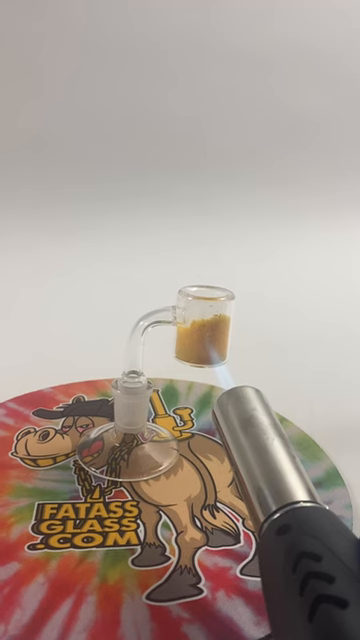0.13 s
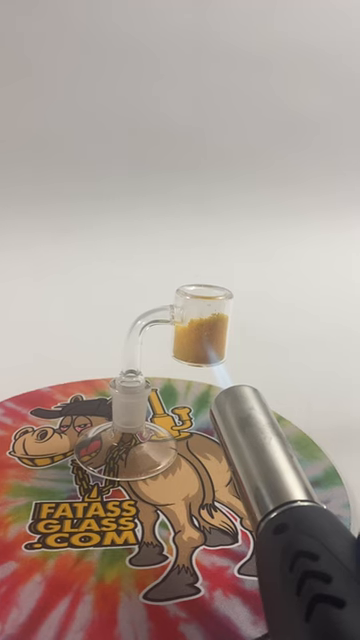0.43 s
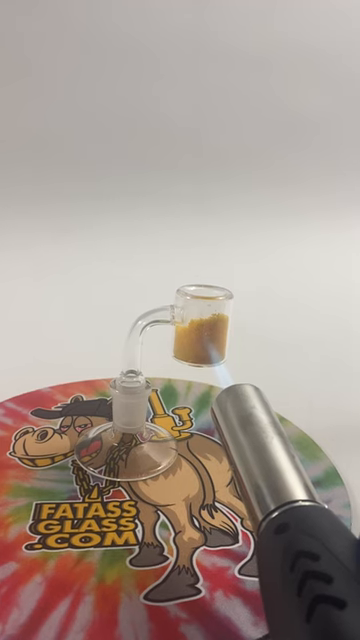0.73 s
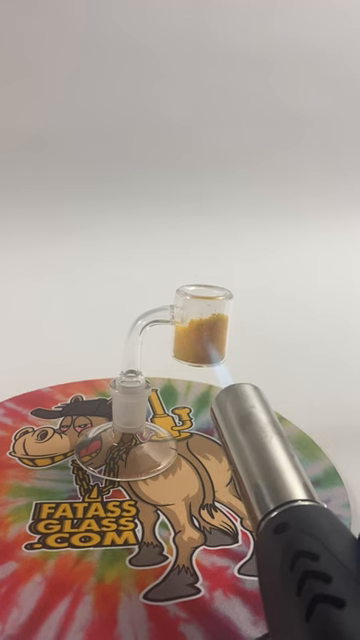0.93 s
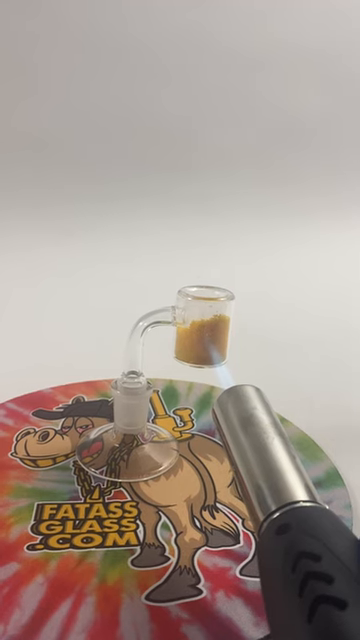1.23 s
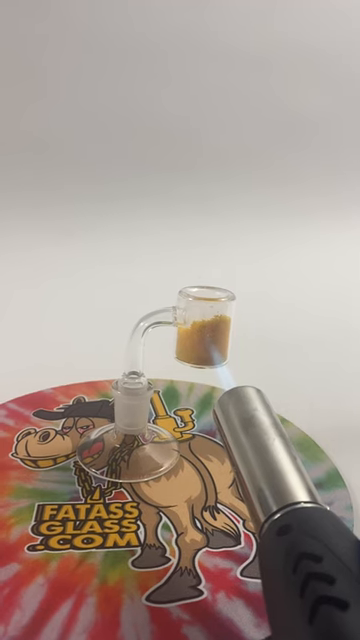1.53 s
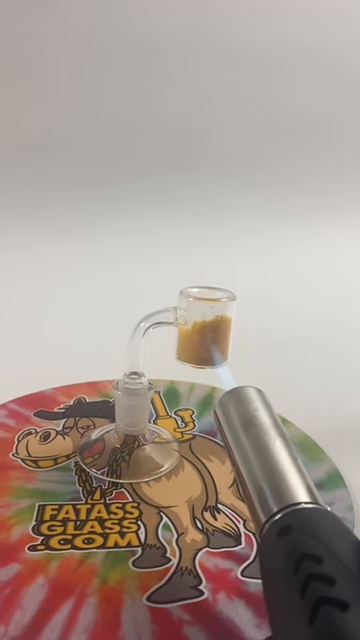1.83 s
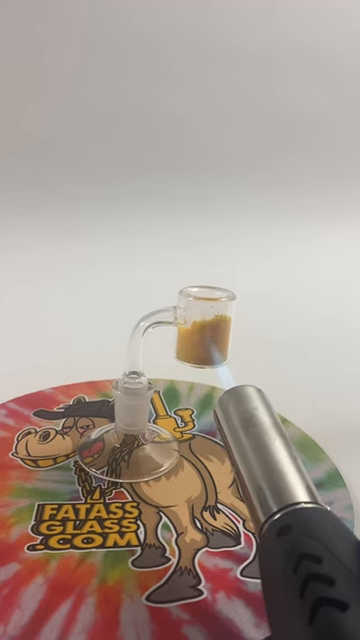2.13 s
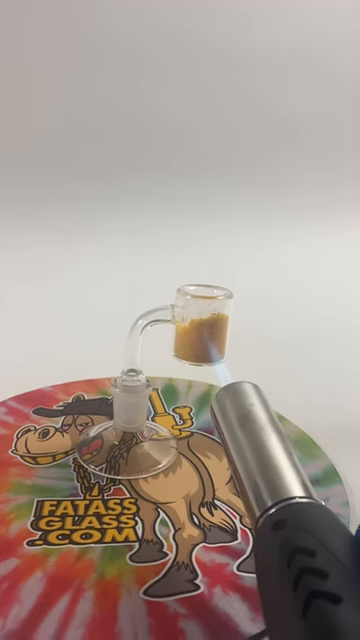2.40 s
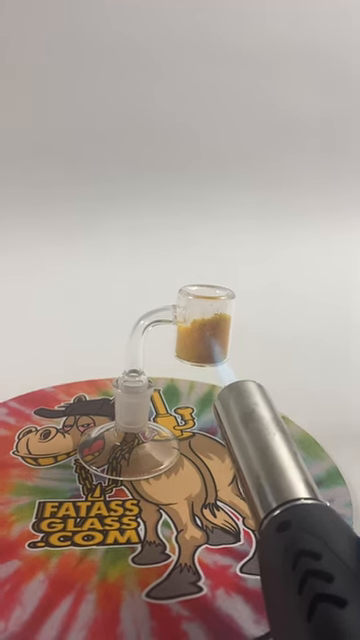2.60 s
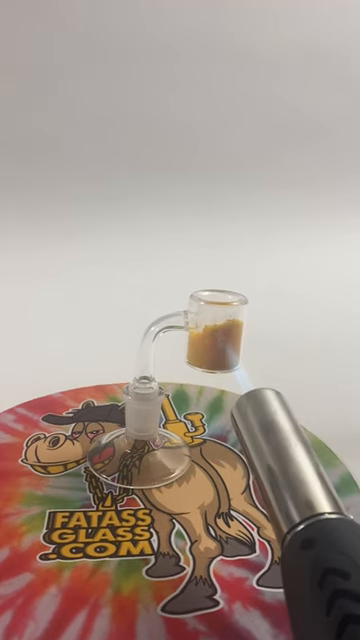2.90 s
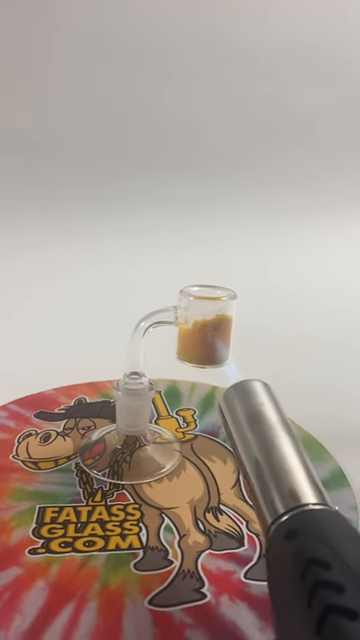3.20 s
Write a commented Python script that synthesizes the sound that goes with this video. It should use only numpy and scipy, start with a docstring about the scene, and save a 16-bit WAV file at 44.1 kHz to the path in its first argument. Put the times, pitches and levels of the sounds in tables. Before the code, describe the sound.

Close up in a room, a butane torch flame roars evenly with a gas hiss throughout. Hot air rumbles and thumps at the microphone, lightly at first and then harder, and the heated glass cup ticks faintly twice near the end.

```python
"""A handheld butane torch burns indoors, close to a pair of microphone ports, its flame on a glass cup.
The flame roars in the barrel's resonances and gas hisses at the nozzle.
Eddies of hot air rumble and thump at the microphone.
Late on, the heated glass ticks twice and a thin hiss joins in."""
import sys
import numpy as np
from scipy import signal
from scipy.fft import rfft, irfft, next_fast_len
from scipy.io import wavfile
from scipy.ndimage import uniform_filter1d, map_coordinates

SR = 44100
rng = np.random.default_rng(int(sys.argv[2]) if len(sys.argv) > 2 else 0)


def to_wav(s):
    """Save 16-bit WAV."""
    ch = np.atleast_2d(s).T  # columns
    pcm = np.round(np.clip(ch, -1, 1) * 32767)  # PCM
    wavfile.write(sys.argv[1], SR, pcm.astype(np.int16))


N = 147735

# Colour of the barrel's roar, its upper edge and the nozzle hiss, close up at the two ports:
# (frequency [Hz], relative mid level [dB], side minus mid [dB], side lead [rad], side-mid likeness [0-1])
ROAR_COLOUR = [(280, -7, -18, -0.6, 0.49), (320, -1, -17, -0.2, 0.9), (420, -2, -14, -0.1, 0.96),
               (500, -1, -10, -0.1, 0.98), (550, -3, -9, -0.1, 0.97), (600, -6, -9, -0.1, 0.94),
               (690, -4, -6, -0.1, 0.99), (750, -6, -4, -0.1, 0.98), (840, -5, -4, -0.5, 0.99),
               (950, -10, -3, -0.2, 0.99), (1050, -17, 1, -0.7, 0.92), (1120, -12, -1, -0.7, 0.99),
               (1220, -13, 1, -1.0, 0.98), (1330, -15, 0, -1.4, 0.98), (1420, -19, -8, -1.3, 0.76),
               (1500, -15, -5, -0.6, 0.97), (1600, -10.5, -6, -0.8, 0.98), (1680, -11, -6, -0.5, 0.98),
               (1730, -14.5, -6, -0.3, 0.97), (1850, -15, -4, 0.1, 0.97), (1940, -20, -1, 0.4, 0.96),
               (2000, -15.5, -2, 0.5, 0.93), (2060, -21, 4, 1.0, 0.91), (2120, -30, 12, 1.5, 0.68),
               (2220, -36, 15, 3.5, 0.54)]
UPPER_ROAR_COLOUR = [(2220, -8, 15, -2.7, 0.54), (2350, -4, 8, -2.4, 0.88), (2440, 1, 3, -2.3, 0.88),
                     (2500, -3, 4, -2.1, 0.87), (2600, -4, 2, -1.7, 0.85), (2780, -5, 4, -1.6, 0.87),
                     (3050, -15, 6, -1.2, 0.22), (3300, -15, 8, 0.2, 0.61), (3700, -15, 9, 0.4, 0.58),
                     (4100, -18, 11, 0.1, 0.51), (4350, -37, 26, -1.4, 0.03)]
NOZZLE_COLOUR = [(4350, -47, 32, -1.4, .03), (4600, -44, 27, .9, .01), (4900, -45, 25, -.8, .07),
                 (5200, -21, 8, .4, .6), (5380, -15, 4, .9, .72), (5600, -3, -2, 1.6, .86),
                 (5760, -1, -4, 1.7, .91), (6150, -2, -7, 1.6, .9), (6350, -8, -6, 1.6, .81),
                 (6600, -14, -5, 1.6, .65), (7500, -20, -2, 1.6, .53), (8300, -24, 1, 1.5, .59),
                 (8500, -21, 2, 1.5, .75), (8700, -25, 1, 1.6, .62), (9250, -22, 3, 1.5, .8),
                 (9550, -28, 3, 1.7, .5), (9800, -45, 16, 1.7, .1), (10100, -66, 36, 1.7, .05),
                 (11200, -68, 41, 1.7, .05), (12300, -74, 42, 1.7, .04)]
# Strength of the flame: (time [s], roar level [dB], upper roar level [dB], nozzle hiss level [dB])
FLAME_LEVELS = [(0, -29, -56, -50), (.5, -28.5, -56, -50.5), (1.16, -29, -57, -50.5), (1.22, -27, -56, -50),
                (1.28, -29.5, -56, -51), (1.52, -28, -56.5, -50), (1.8, -28.5, -56.5, -50),
                (2.26, -28, -56.5, -50.5), (2.4, -29.5, -56.5, -51), (2.57, -29, -56.5, -50.5),
                (2.9, -29, -56, -50.5), (3.1, -29.5, -57.5, -50.5), (3.35, -30.5, -58, -50.5)]


def torch_flame():
    """Close to the microphone, the flame roars in the barrel and gas hisses at the nozzle; both flicker."""
    roar_db, upper_db, hiss_db = curves(FLAME_LEVELS)
    roar = amp(roar_db + 0.39 * wobble(25.04) + 0.36 * wobble(70)) * rush(ROAR_COLOUR, patchy_db=0.92)
    upper = amp(upper_db + 0.55 * wobble(22)) * rush(UPPER_ROAR_COLOUR, patchy_db=1.5)
    hiss = amp(hiss_db + 0.2 * wobble(30) + 0.36 * wobble(60)) * rush(NOZZLE_COLOUR, patchy_db=1.1)
    return roar + upper + hiss


# Colour of the hot air at the two ports:
# (frequency [Hz], relative mid level [dB], side minus mid [dB], side lead [rad], side-mid likeness [0-1])
RUMBLE_COLOUR = [(25, -26, -26, -1.8, .3), (33, -15, -30, -1.8, .3), (45, 0, -33, -1.8, .4),
                 (65, -1, -31, -1.9, .5), (95, -9, -28, -1.8, .5), (120, -4, -26, -1.6, .6),
                 (190, -12, -21, -1.2, .6), (240, -7, -20, -.4, .8), (280, -11, -18, -.3, .8)]
# Strength of the turbulence: (time [s], level [dB])
RUMBLE_LEVELS = [(0.0, -35), (.15, -33), (0.45, -33.5), (1.0, -35), (1.51, -32.5), (1.75, -35.5),
                 (2.0, -33), (2.45, -32), (2.57, -32), (2.71, -30.5), (2.87, -35.5), (3.04, -32),
                 (3.35, -35.5)]


def hot_air_rumble():
    """Turbulence in the hot air lays a lumpy, low rumble under the flame."""
    level_db, = curves(RUMBLE_LEVELS)
    return amp(level_db + 0.74 * wobble(9.6)) * rush(RUMBLE_COLOUR, patchy_db=0.54)


# Eddies at the microphone: (time [s], peak level [dB], final pitch [Hz], time to peak [cycles])
EDDIES = [(0.621, -20.5, 44, 0.7), (0.683, -25.5, 43, .8), (0.855, -29, 44, 0.97), (1.951, -30, 44, 0.75),
          (2.008, -27, 44.2, .8), (2.044, -24, 57.4, 1), (2.109, -23, 56.6, 1), (2.203, -29.5, 47, 1),
          (2.3133, -8.5, 84.4, 0.86), (2.334, -18.5, 95, 1), (2.389, -21.5, 64, 0.86),
          (2.676, -21.5, 120, 0.99), (2.697, -22, 74, 0.83), (2.719, -24, 81, 1), (2.974, -24, 37, 0.63)]


def eddy_thumps(glide=6, glide_cycles=.32, sharpness=1.2, start_rad=.2, left_lag_s=0.00024):
    """Each eddy is a short swell of falling pitch that reaches the left port just after the right."""
    out, t = np.zeros(N + SR), np.arange(SR // 5) / SR
    for s, db, final_hz, peak_cycles in EDDIES:
        cycles = t * final_hz
        # the pitch starts at (1 + glide) times its final value
        turns = cycles + glide * glide_cycles * (1 - np.exp(-cycles / glide_cycles))
        age = cycles / peak_cycles
        swell = (age * np.exp((1 - age ** 2) / 2)) ** sharpness
        out[round(s * SR):][:len(t)] += amp(db) * swell * np.sin(2 * np.pi * turns + start_rad)
    return filtered(out[:N], lambda hz: np.exp(1j * np.pi * hz * left_lag_s * np.array([[-1], [1]])))


# Modes of the glass cup: (frequency [Hz], relative level [dB], time to fall 60 dB [s])
CUP_MODES = [(4450, 0, .012), (7600, -3, .006), (11300, -10, .006)]
# Ticks of the cup under the flame, before filtering: (time [s], crack level [dB], ring level [dB])
CUP_TICKS = [(2.7834, -38, -37), (2.9661, -39, -45)]


def glass_ticks(rise_s=.0005, crack_t60_s=.005, low_hz=5000, top_hz=13600, side_lead_rad=1.2, mid_db=-6):
    """The heated glass gives tiny bright cracks and rings briefly; the ports hear it well out of step."""
    out, t = np.zeros((2, N + SR)), np.arange(SR // 30) / SR
    ring = sum(amp(db - 60 * t / t60) * np.sin(2 * np.pi * hz * t) for hz, db, t60 in CUP_MODES)
    onset = 1 - np.exp(-t / rise_s)
    for s, crack_db, ring_db in CUP_TICKS:
        crack = amp(crack_db - 60 * t / crack_t60_s) * rng.standard_normal((2, len(t)))
        out[:, round(s * SR):][:, :len(t)] += (crack + amp(ring_db) * ring) * onset

    def response(hz):
        treble = 1j * hz / (low_hz + 1j * hz) / (1 + (hz / top_hz) ** 8)
        return treble * np.exp(1j * side_lead_rad * np.array([[0], [1]]))
    mid, side = filtered(out[:, :N], response)
    return ports(amp(mid_db) * mid, side)


def thin_hiss(centre_hz=4730, width_hz=240, level_db=-60, start_s=3.04, rise_s=0.036):
    """A faint, narrow, unsteady hiss sets in behind the flame near the end."""
    band = filtered(rng.standard_normal((2, N)), lambda hz: np.exp(-((hz - centre_hz) / width_hz) ** 2))
    rise = np.clip((np.arange(N) / SR - start_s) / rise_s, 0, 1)
    return rise * amp(level_db + 2.2 * wobble(24.94)) * unit(band)


def rush(colour, patchy_db):
    """Rushing noise of one colour at the two ports, patchy in time and frequency, its mid at rms 1."""
    spectrum = signal.stft(rng.standard_normal((2, N)), nperseg=512)[2]
    patches = uniform_filter1d(rng.standard_normal(spectrum.shape[1:]), size=5, axis=0)
    patches = uniform_filter1d(patches, size=6, axis=1)
    shared, own = signal.istft(spectrum * amp(patchy_db * unit(patches)), nperseg=512)[1][:, :N]
    knot_hz, *columns = np.transpose(colour)

    def response(hz):
        mid_db, side_db, lead, alike = [np.interp(np.log1p(hz), np.log1p(knot_hz), c) for c in columns]
        alike = np.clip(alike, 0, 1)
        mid = amp(mid_db) * (hz >= knot_hz[0]) * (hz < knot_hz[-1])
        side = mid * amp(side_db)
        return np.array([mid, side * alike * np.exp(1j * lead), side * np.sqrt(1 - alike ** 2)])
    mid, linked_side, loose_side = filtered(np.array([shared, shared, own]), response)
    return ports(mid, linked_side + loose_side) / np.sqrt(np.mean(mid ** 2))


def amp(db):
    return 10 ** (np.asarray(db) / 20)


def unit(x):
    return x / np.sqrt(np.mean(x ** 2) + 1e-20)


def curves(rows):
    """One value per sample for each column after the time."""
    times, *columns = np.transpose(rows)
    return [np.interp(np.arange(N) / SR, times, c) for c in columns]


def wobble(rate):
    """A smooth random curve, rate knots a second."""
    return map_coordinates(rng.standard_normal(int(N * rate / SR) + 4), [np.arange(N) * rate / SR])


def filtered(x, response):
    """x through a complex response of frequency."""
    size = next_fast_len(N + SR // 2)
    return irfft(rfft(x, size) * response(np.fft.rfftfreq(size, 1 / SR)), size)[..., :N]


def ports(mid, side):
    """Left and right microphone ports from mid and side."""
    return np.array([mid + side, mid - side])


def scene():
    """The torch up close, with the hot air, the cup and the thin hiss behind it."""
    return torch_flame() + hot_air_rumble() + eddy_thumps() + glass_ticks() + thin_hiss()


def record(dry):
    """The recorder cuts off steeply above its band limit."""
    limit_hz = 14400
    return filtered(dry, lambda hz: 1 / (1 + (hz / limit_hz) ** 60))


dry = scene()
out = record(dry)
to_wav(out)
```